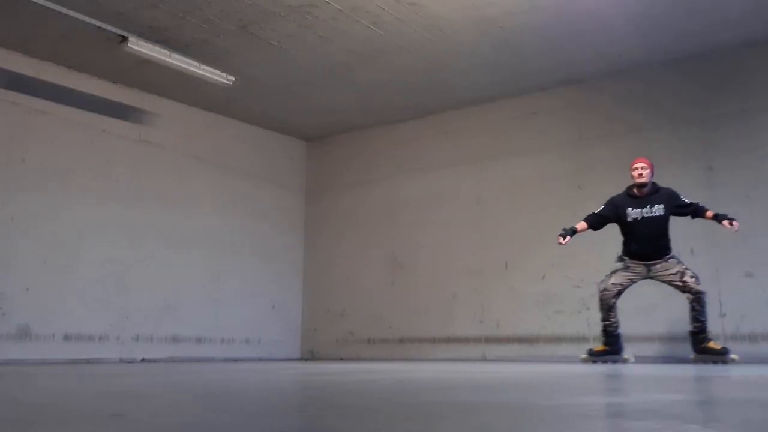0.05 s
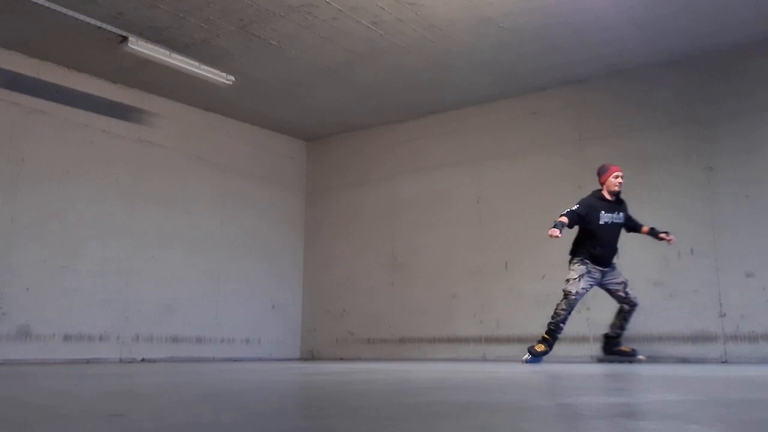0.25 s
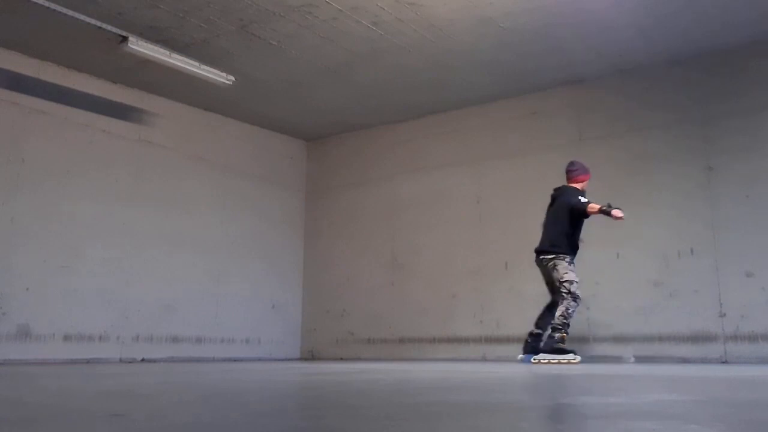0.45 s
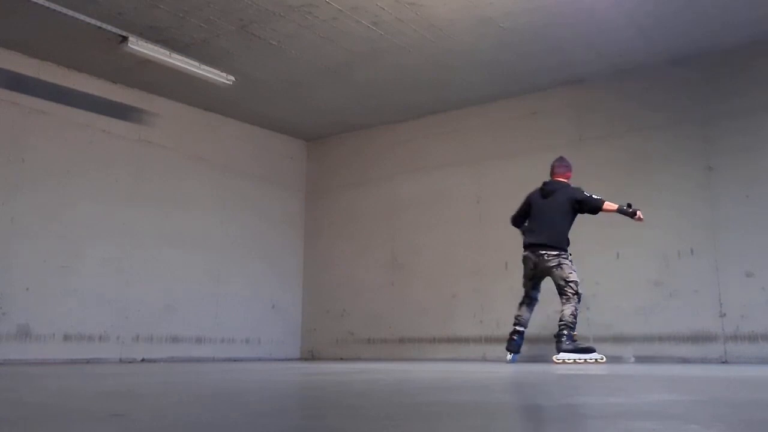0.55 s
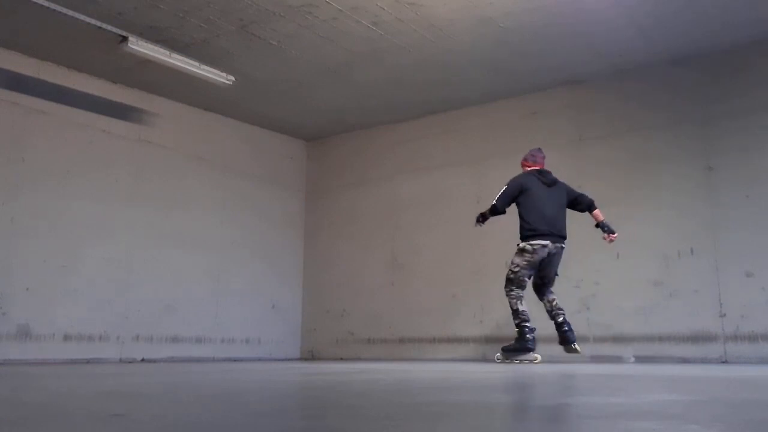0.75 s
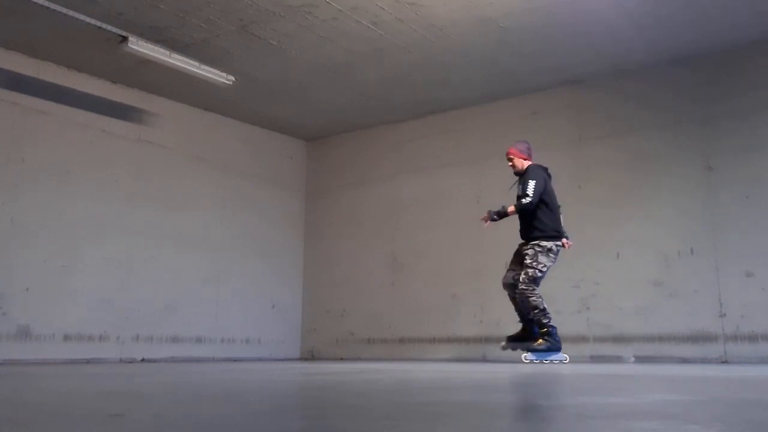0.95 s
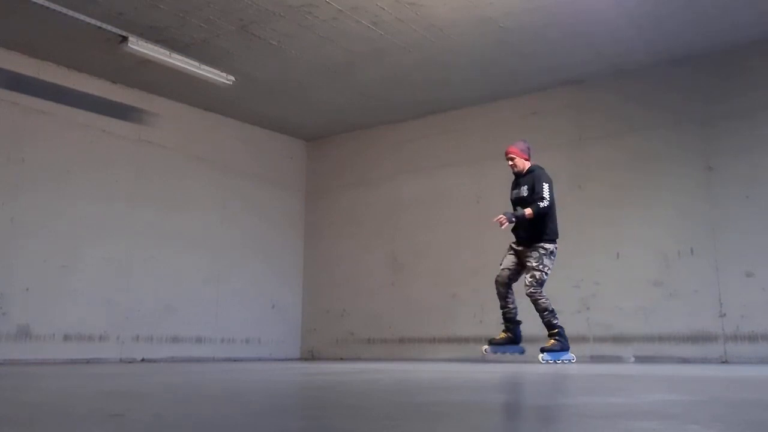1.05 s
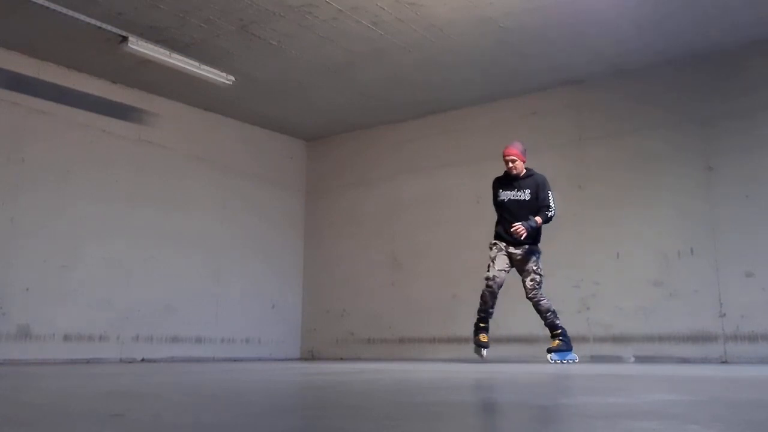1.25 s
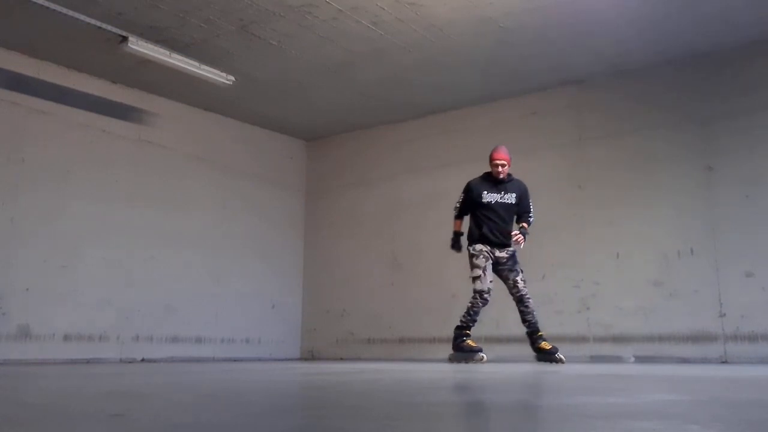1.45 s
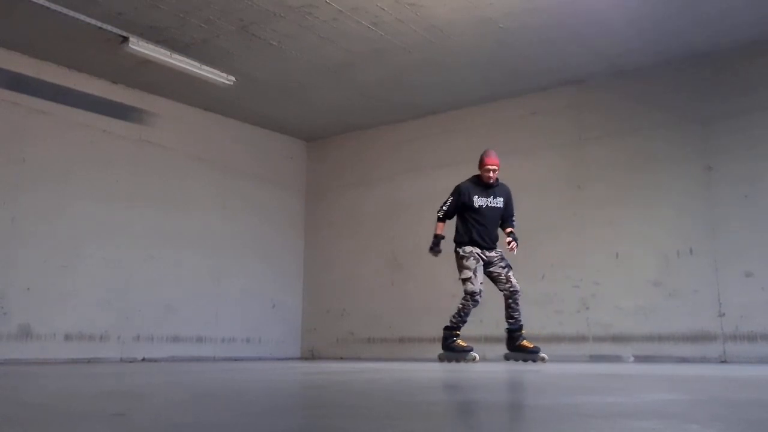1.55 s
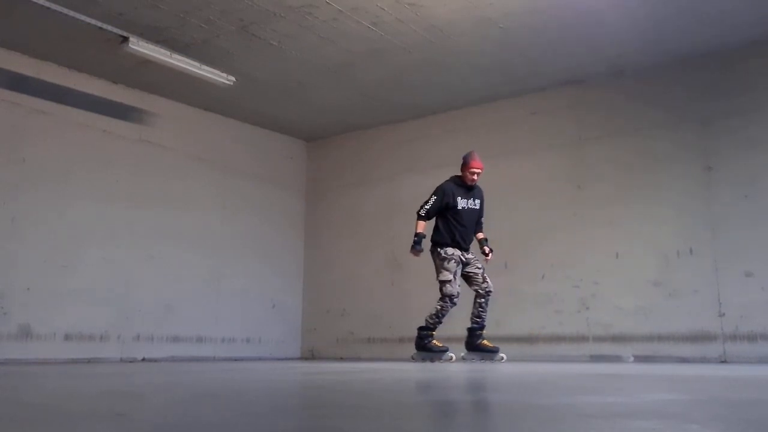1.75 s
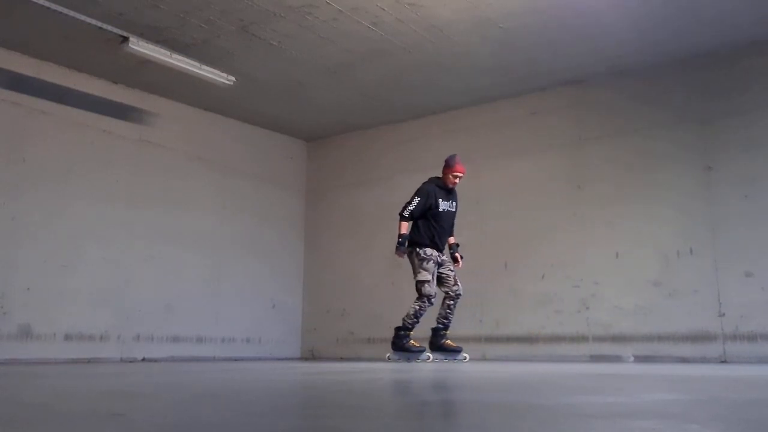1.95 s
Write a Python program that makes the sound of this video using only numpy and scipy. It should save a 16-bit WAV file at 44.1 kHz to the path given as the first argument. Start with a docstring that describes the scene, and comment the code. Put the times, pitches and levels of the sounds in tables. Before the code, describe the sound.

Inline skates whirr and skid through a spin, clacking in a bare concrete room.

```python
"""Wheels rumble and whirr on smooth concrete, with a thin whine: an inline skater spins in a bare hall.
Pushed sideways, the wheels hiss and judder as they stick and slip, shaking the boot.
Frames clack and boots knock as the weight shifts, and a lifted skate lands again with a thud.
Judder and clacks echo off the walls, over the hall's low drone."""
import sys
import numpy as np
from scipy import signal
from scipy.fft import rfft, irfft, next_fast_len
from scipy.io import wavfile
from scipy.ndimage import map_coordinates

SR = 44100
rng = np.random.default_rng(int(sys.argv[2]) if len(sys.argv) > 2 else 0)


def transcribe(signal):
    """Save signal, clipped to [-1, 1], as a 16-bit WAV file at the path in sys.argv[1]."""
    frames = np.atleast_2d(signal).T
    limited = np.clip(frames, -1, 1)
    pcm = np.round(limited * 32767).astype(np.int16)
    wavfile.write(sys.argv[1], SR, pcm)


N = 88200


def rolling():
    """Wheels run over the fine texture of the floor: low rumble, hollow roll and a whirr on top."""
    # Fader rides, each trimmed in the mix below: t/s, level/dB
    rumble_ride = [(0, -50.5), (.06, -53.5), (.22, -54.5), (.3, -42), (.39, -54.5), (.45, -46), (.5, -41),
                   (.55, -43), (.83, -49.5), (1.05, -49), (1.38, -51), (1.41, -42), (1.51, -41.5),
                   (1.56, -44.5), (1.75, -48.5), (2, -48)]
    roll_ride = [(0.0, -49), (0.03, -44), (0.42, -39), (0.45, -40.5), (0.46, -37.5), (0.51, -41.5),
                 (0.86, -44.5), (0.89, -40.5), (1.01, -48.5), (1.17, -49), (1.2, -53.5), (1.39, -52),
                 (1.41, -40), (1.45, -44), (1.48, -37.5), (1.5, -43), (2.0, -52)]
    whirr_ride = [(0.0, -53), (0.01, -53.5), (0.24, -47.5), (0.45, -49.5), (0.46, -46), (0.49, -47),
                  (0.54, -47.5), (0.72, -52), (1.02, -58), (1.2, -58), (1.22, -63.5), (1.38, -63.5),
                  (1.39, -54), (1.46, -49.5), (1.68, -58.5), (2.0, -66)]
    # Tone of each layer: f/Hz, level/dB
    rumble_eq = [(25, -36), (45, -19), (65, -12), (95, 1), (135, 3), (180, -5.5), (250, 3), (320, -7),
                 (410, -7.5), (520, -20), (900, -79)]
    roll_eq = [(150, -40), (300, -4), (400, -3), (520, 3), (700, 2), (830, 0), (1040, 3), (1160, -3),
               (1300, -14.5), (1600, -17), (3000, -42.5)]
    whirr_eq = [(900, -40), (1300, -8), (1650, 2), (1980, 3.5), (2300, -2), (2700, -4), (3200, -7.5),
                (4000, -14.5), (7000, -78)]
    rumble = amp(curves(rumble_ride)[0] + 4.5) * grit(rumble_eq, grain_db=0.5, grain_hz=60)
    roll = amp(curves(roll_ride)[0] - 1.5) * grit(roll_eq, grain_db=0.5, grain_hz=90)
    whirr = amp(curves(whirr_ride)[0] - 2) * grit(whirr_eq, grain_db=0.4, grain_hz=270)
    return rumble + roll + whirr


def judder():
    """In a skid the wheels grip and let go at a slowly falling rate; each slip shakes the boot."""
    # Skids: t/s, length/s, first slip rate/Hz, last slip rate/Hz, drive level/dB
    skids = [(.232, 0.064, 166, 155, -32.5), (.264, .022, 183.7, 174, -20.5), (.297, .036, 171, 152, -22),
             (0.405, .017, 142.5, 130, -22), (0.442, .03, 156.5, 138, -25), (.474, .06, 140.7, 137.2, -20),
             (.55, 0.041, 130.6, 130, -37), (.595, .022, 161, 154, -30.5),
             (0.649, 0.0495, 152.3, 122.5, -32), (0.844, .06, 161, 139.6, -33),
             (1.393, .048, 123.9, 115.6, -29), (1.456, 0.065, 124.4, 117.5, -28)]
    # Resonances of skate and boot: f/Hz, width/Hz, level/dB
    boot_modes = [(144, 81, -2.5), (219, 36, -10)]
    jitter_cycles, scatter_db, lowpass_hz, reverb_db = .025, 1.2, 211.5, -11

    def boot(hz):
        ring = sum(amp(db) * 1j * hz * width / (centre ** 2 - hz ** 2 + 1j * hz * width)
                   for centre, width, db in boot_modes)
        return ring / np.sqrt(1 + (hz / lowpass_hz) ** 10)

    slips = np.zeros(N)
    for start, length, first_hz, last_hz, db in skids:
        late, size = rng.standard_normal((2, 32))
        t = np.arange(int(length * SR)) / SR
        cycles = np.cumsum(np.linspace(first_hz, last_hz, len(t))) / SR
        for k in range(int(cycles[-1]) + 1):
            onset = start + np.interp(k, cycles, t) + jitter_cycles * late[k] / first_hz
            kick = -amp(db + scatter_db * size[k]) * SR / first_hz / 2
            add(slips, onset, [kick])
    shake = filtered(slips, boot)
    return shake + amp(reverb_db) * hall_reverb(shake)


def clacks():
    """Frames and wheels make short, hard contacts, heard directly and off the walls."""
    # Hits: t/s, level/dB, brightness/dB
    hits = [(.1585, -45, -9), (.38, -42, -7), (.4, -33.5, -3), (.4614, -26, 1.5), (.4835, -34, -5),
            (.8799, -42.5, 4.5), (1.09, -47, 7), (1.1628, -40, 6), (1.1707, -42, 2), (1.185, -46, -6),
            (1.1932, -43, -3.5), (1.222, -51.5, 6), (1.3925, -38, -4.5), (1.41, -34, -19),
            (1.5204, -40.5, 4.5), (1.5389, -41.5, -2.5), (1.5524, -43, -1)]
    # Tone of a hit: f/Hz, level/dB
    clack_eq = [(100, -55), (350, 16), (1000, 14), (1350, -3), (1900, 8), (3800, -2), (5000, -1),
                (6500, -39), (7800, -12.5), (10000, -18.5), (15800, -38)]
    body_t60_s, snap_t60_s, snap_db = .012, .005, 4
    shelf_hz, reverb_db = 5500, 0.5
    out, t = np.zeros((2, N)), np.arange(SR // 20) / SR
    decay = amp(-60 * t / body_t60_s) + amp(snap_db - 60 * t / snap_t60_s)
    for start, db, brightness in hits:
        shelf_db = 2 * brightness
        tone = lambda hz: amp(along(clack_eq, hz) + shelf_db * hz ** 4 / (hz ** 4 + shelf_hz ** 4))
        burst = unit(diffuse(filtered(rng.standard_normal((2, len(t))), tone)))
        attack_s = .0001 * amp(-shelf_db)  # duller contacts are softer and rise more slowly
        attack = 1 - np.exp(-t / attack_s)
        for track, sound in zip(out, amp(db) * burst * attack * decay):
            add(track, start, sound)
    return out + amp(reverb_db) * hall_reverb(out[0])


def scraping():
    """Wheels brush sideways over dust: a grainy rasp under a bright hiss."""
    # Fader rides, trimmed below: t/s, rasp level/dB, hiss level/dB
    scrape_ride = [(0, -61.5, -66.5), (.204, -57.5, -65), (.27, -54, -60.5), (.352, -54.5, -65.5),
                   (.408, -52.5, -62), (.452, -51.5, -60.5), (.465, -51, -56.5), (.528, -59.5, -64.5),
                   (.66, -61.5, -68), (.87, -62.5, -68), (.888, -53.5, -61), (1.002, -68, -73),
                   (1.046, -63.5, -68), (1.158, -60.5, -73.5), (1.19, -52.5, -65), (1.256, -62, -89),
                   (1.383, -72, -86), (1.405, -56.5, -68), (1.465, -56, -66), (1.55, -54, -66),
                   (1.68, -66.5, -75.5), (1.77, -64, -83), (1.84, -74.5, -87), (2, -81, -87)]
    # Tone of each layer: f/Hz, level/dB
    rasp_eq = [(2000, -26), (3000, -8.5), (3500, 3), (3950, 3.5), (4450, -5), (4900, -2.5), (5600, -23),
               (7000, -5), (12000, -71)]
    hiss_eq = [(3500, -32), (5500, 10.5), (6900, -9), (7700, 7), (8500, -1), (10000, -.5), (12000, 0.5),
               (15800, -6)]
    rasp_db, hiss_db = curves(scrape_ride)
    rasp = amp(rasp_db - 4) * grit(rasp_eq, grain_db=1.8, grain_hz=220)
    hiss = amp(hiss_db + 1) * grit(hiss_eq, grain_db=1.1, grain_hz=140)
    return rasp + hiss


def knocks():
    """The loaded boot shell and frame give a hollow ring when the wheels bite."""
    # Bites: t/s, level/dB
    bites = [(.463, -33.5), (.484, -40), (1.409, -38), (1.472, -38)]
    # Modes of shell and frame: f/Hz, level/dB, t60/s
    shell_modes = [(361, 1, 0.1), (407.2, -3, 0.17), (507.8, -5.5, 0.24), (720, -5.5, 0.096),
                   (928.4, -2, 0.2), (1026.6, -0.5, .12), (1224, -4.5, 0.079), (2560, -13, 0.063),
                   (3800, -13, .07)]
    out, t = np.zeros((2, N)), np.arange(SR // 4) / SR
    attack = 1 - np.exp(-t / 0.0031)
    for start, db in bites:
        for track in out:
            ring = sum(amp(db + mode_db - 60 * t / t60) * np.sin(2 * np.pi * (hz * t + rng.random()))
                       for hz, mode_db, t60 in shell_modes)
            add(track, start, ring * attack)
    return diffuse(out)


def thuds():
    """The skater's weight comes down on the floor: a round bass thump."""
    # Steps: t/s, level/dB
    steps = [(0.109, -45), (0.284, -47), (0.458, -44), (0.927, -34.5), (1.27, -42), (1.403, -48),
             (1.472, -30.5), (1.726, -44), (1.841, -46)]
    pitch_hz, attack_s = 71.2, .018
    out, t = np.zeros(N), np.arange(SR // 3) / SR
    thump = t / attack_s * np.exp(1 - t / attack_s) * np.sin(2 * np.pi * pitch_hz * t)
    for start, db in steps:
        add(out, start, amp(db) * thump)
    return out


def whines():
    """Wheels on the edge of slipping sing in a narrow, unsteady band, a little to the left."""
    # Glides: t/s, length/s, first f/Hz, last f/Hz, width/Hz, level/dB
    glides = [(-.05, 0.074, 1950, 1990, 60, -46.5), (0.046, 0.093, 1974, 2004, 68.6, -51),
              (0.129, 0.051, 3060, 3070, 89.4, -52), (0.152, 0.18, 1988, 2028, 131, -53),
              (0.502, .13, 2390, 2170, 300.4, -52), (0.568, .15, 2150, 2000, 260.2, -50)]
    out = np.zeros((2, N))
    for start, length, first_hz, last_hz, width_hz, db in glides:
        progress = np.clip((np.arange(N) / SR - start) / length, 0, 1)
        phase = 2 * np.pi * np.cumsum(first_hz + (last_hz - first_hz) * progress) / SR
        swell = amp(db) * np.sqrt(4 * progress * (1 - progress))
        for track in out:
            track += swell * (wobble(width_hz) * np.cos(phase) + wobble(width_hz) * np.sin(phase))
    return out * pan(left_db=3)


def hall_reverb(x):
    """The concrete walls answer with a long stereo tail that lingers in the low mids."""
    # Decay of the hall: f/Hz, t60/s
    decay_times = [(100, 1.27), (500, 2.1), (2000, 0.55), (5000, 1.1), (12000, 0.69)]
    hz, t, noise = signal.stft(rng.standard_normal((2, N)), SR, nperseg=256)
    decay = amp(-60 * t / along(decay_times, hz)[:, None])
    tail = diffuse(signal.istft(noise * decay, SR, nperseg=256)[1])
    return signal.fftconvolve(x[None], tail / np.linalg.norm(tail[0]), axes=1)[:, :N]


def hall_drone():
    """A quiet bed of low room tone."""
    # Tone of the room: f/Hz, level/dB
    room_eq = [(20, -11), (35, 1), (48, -9), (62, 15), (85, -14.5), (130, 3), (250, -18.5), (1000, -39),
               (4000, -36), (15000, -96)]
    return amp(-51) * grit(room_eq, grain_db=-1, grain_hz=14)


def grit(eq, grain_db, grain_hz):
    """Noise with a flickering level, like countless tiny contacts; shaped, spread, mono rms 1."""
    contacts = rng.standard_normal((2, N)) * amp(grain_db * wobble(grain_hz))
    pair = diffuse(filtered(contacts, lambda hz: amp(along(eq, hz))))
    return pair / np.std(pair.mean(axis=0))


def diffuse(pair):
    """Two unrelated signals become the hall's stereo field: narrow in the bass, wide in the treble."""
    # Likeness of left and right: f/Hz, correlation
    likeness = [(40, 0.8), (130, 0.9), (250, 0.84), (500, 0.67), (1000, 0.43), (2000, -0.17), (4000, 0),
                (12000, -0.13)]
    angle = lambda hz: np.arccos(np.clip(along(likeness, hz), -1, 1)) / 2
    mid, side = filtered(pair, lambda hz: np.array([np.cos(angle(hz)), np.sin(angle(hz))]))
    return np.array([mid + side, mid - side])


def amp(db):
    """Decibels to gain."""
    return 10 ** (np.asarray(db) / 20)


def pan(left_db):
    """Stereo gains with the left side left_db above the right."""
    return amp(left_db * np.array([[.5], [-.5]]))


def unit(x):
    """Scale to rms 1."""
    return x / np.sqrt(np.mean(x ** 2) + 1e-20)


def along(points, hz):
    """Read (f/Hz, value) points on a log frequency axis."""
    freqs, values = np.transpose(points)
    return np.interp(np.log(hz + 1), np.log(freqs + 1), values)


def curves(rows):
    """One value per sample for each column after the time."""
    times, *columns = np.transpose(rows)
    return [np.interp(np.arange(N) / SR, times, column) for column in columns]


def wobble(rate):
    """A smooth random curve, rate knots a second."""
    return map_coordinates(rng.standard_normal(4096), [np.arange(N) * rate / SR], mode="mirror")


def filtered(x, response):
    """Filter x by a gain given as a function of frequency."""
    n = x.shape[-1]
    padded = next_fast_len(n + SR // 4)
    return irfft(rfft(x, padded) * response(np.fft.rfftfreq(padded, 1 / SR)), padded)[..., :n]


def add(track, start_s, sound):
    """Mix a sound in at start_s."""
    part = track[max(round(start_s * SR), 0):][:len(sound)]
    part += sound[:len(part)]


def scene():
    """The skates over the low drone of the hall."""
    return rolling() + whines() + scraping() + judder() + thuds() + knocks() + clacks() + hall_drone()


def record(dry):
    """Two microphones, each with its own colour, and a hard cut of the extreme treble."""
    # Stereo balance: f/Hz, left over right/dB
    balance = [(60, 0), (99, -2.5), (160, -0.5), (270, 0.5), (450, 0.0), (740, -0.5), (1220, 0), (2010, 2),
               (3330, 6.5), (5500, 0.5), (9080, -5), (15000, 2)]
    top_hz = 15850
    return filtered(dry, lambda hz: pan(along(balance, hz)) * (hz < top_hz))


dry = scene()
out = record(dry)
transcribe(out)
```